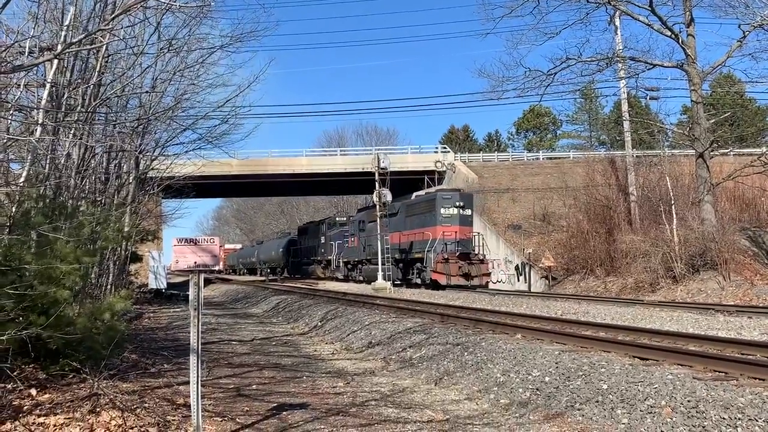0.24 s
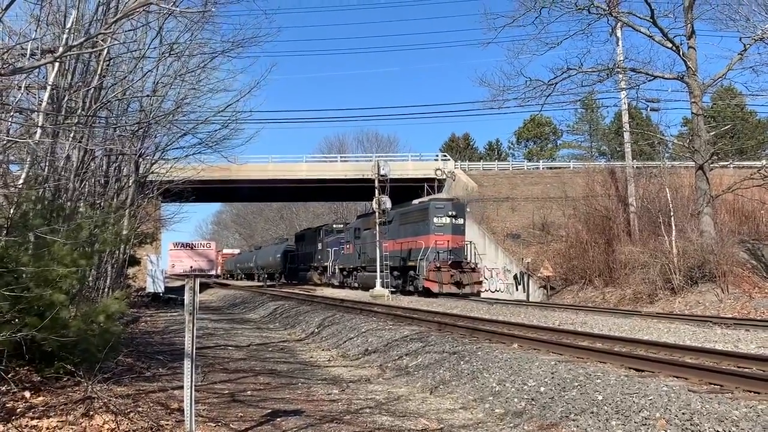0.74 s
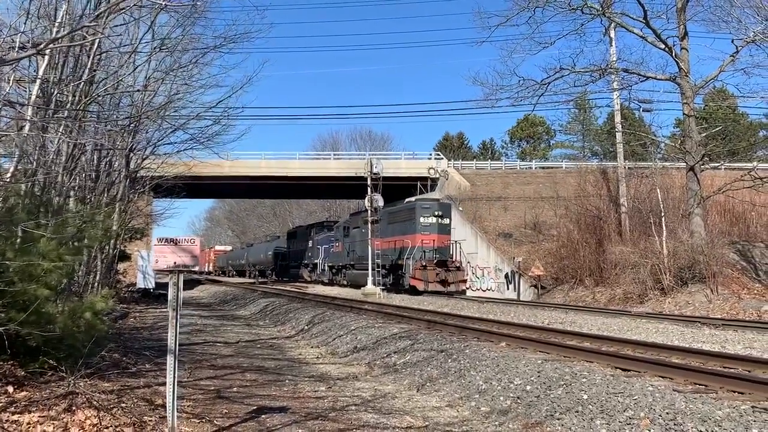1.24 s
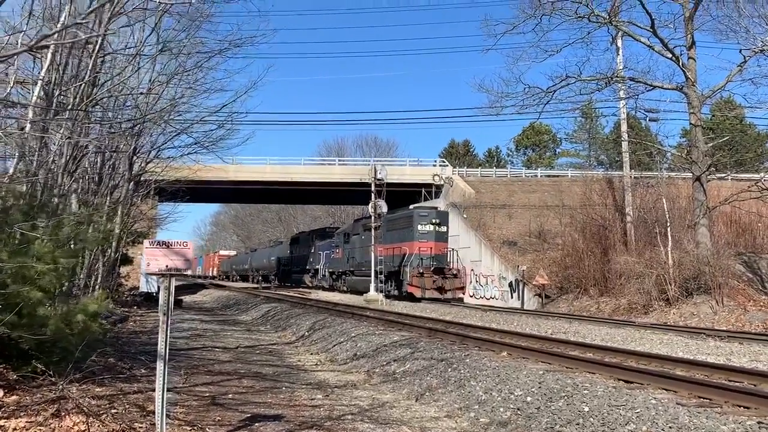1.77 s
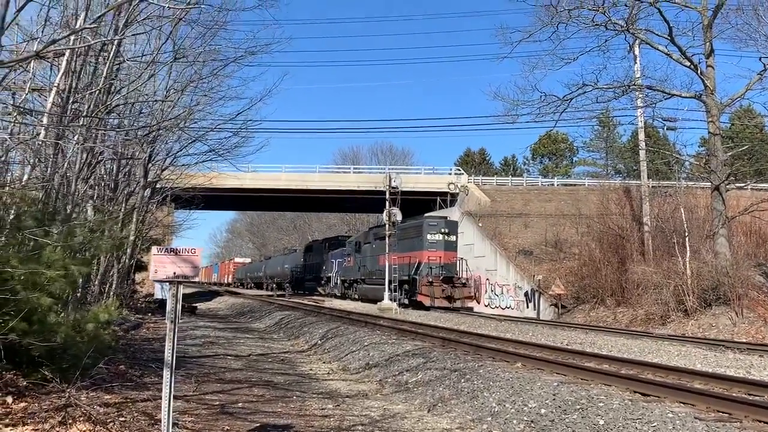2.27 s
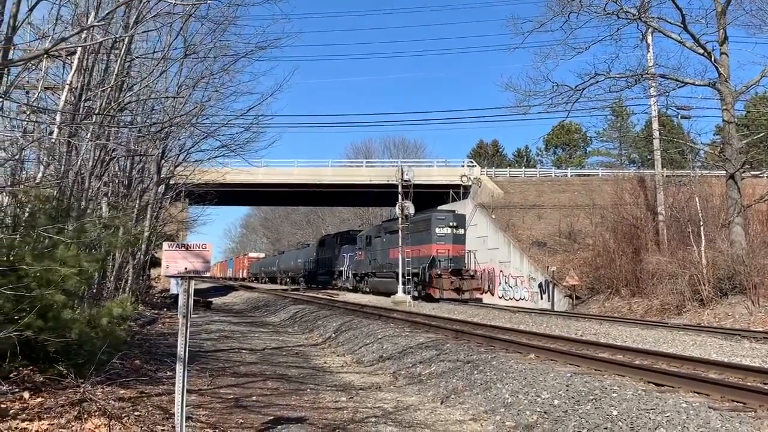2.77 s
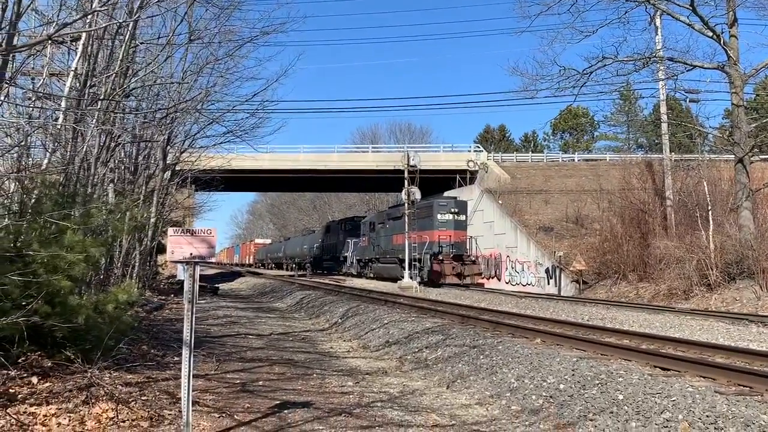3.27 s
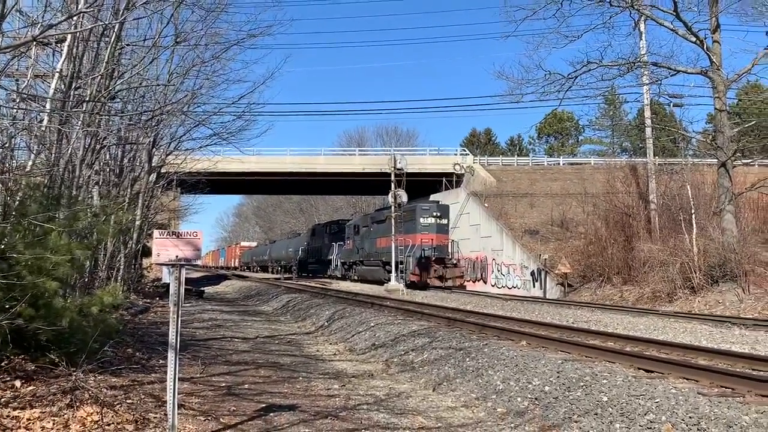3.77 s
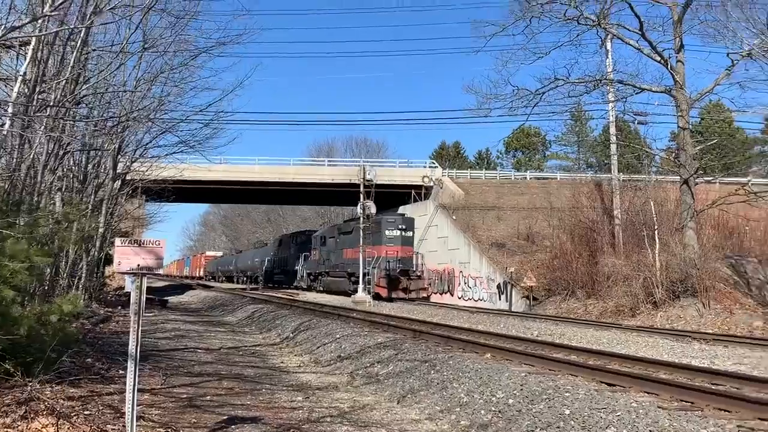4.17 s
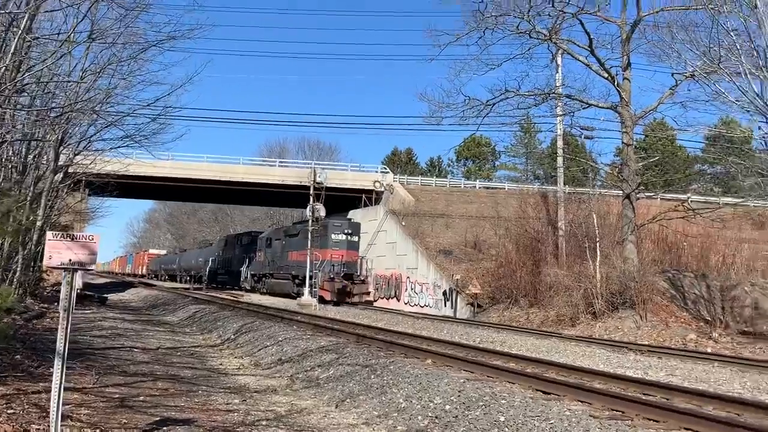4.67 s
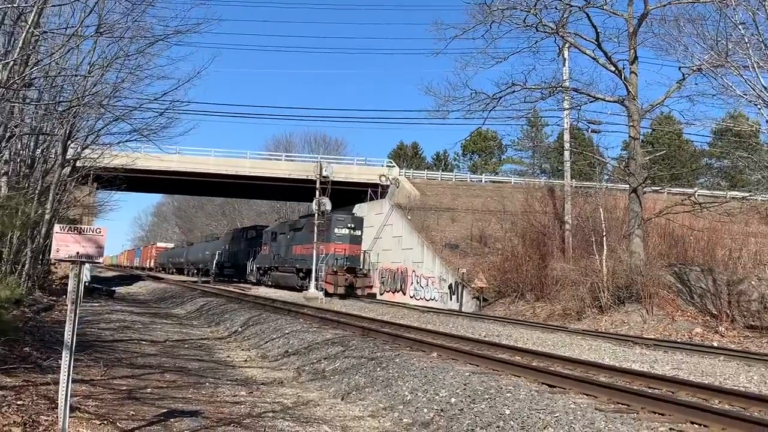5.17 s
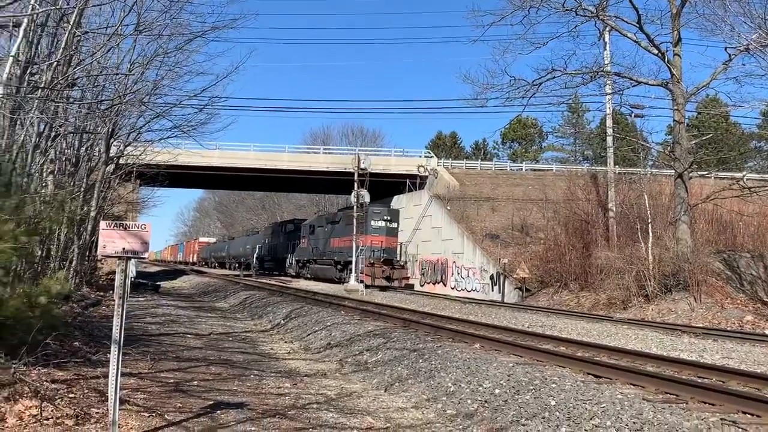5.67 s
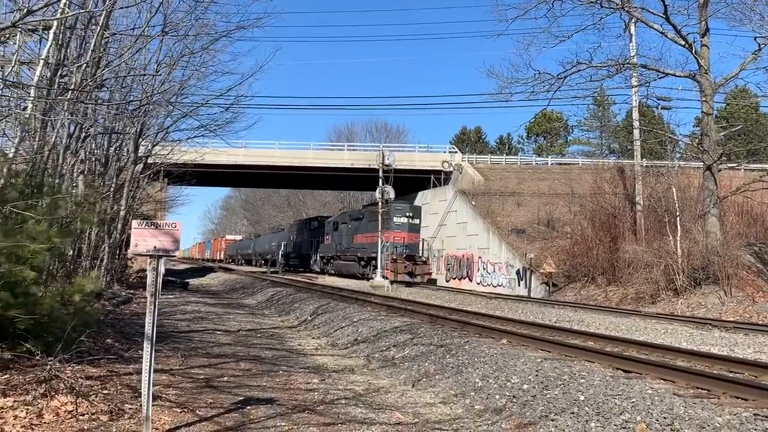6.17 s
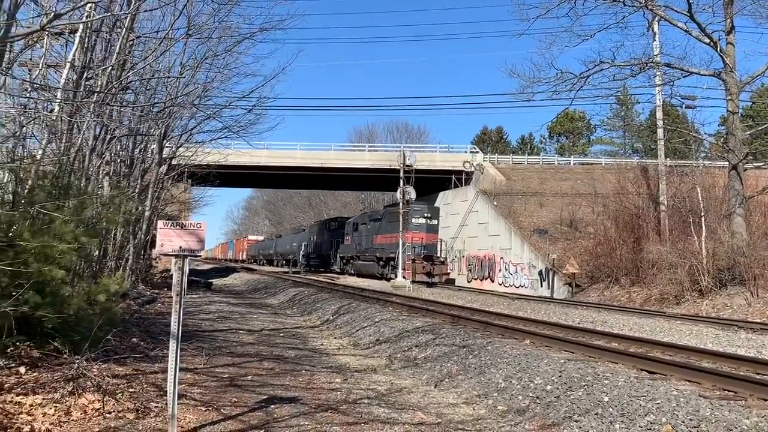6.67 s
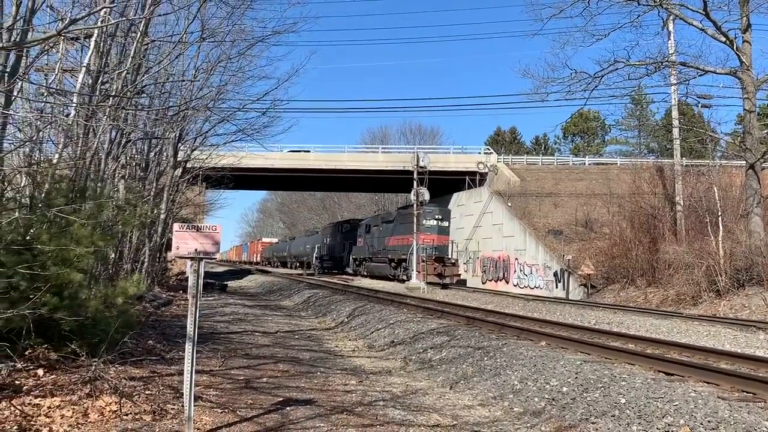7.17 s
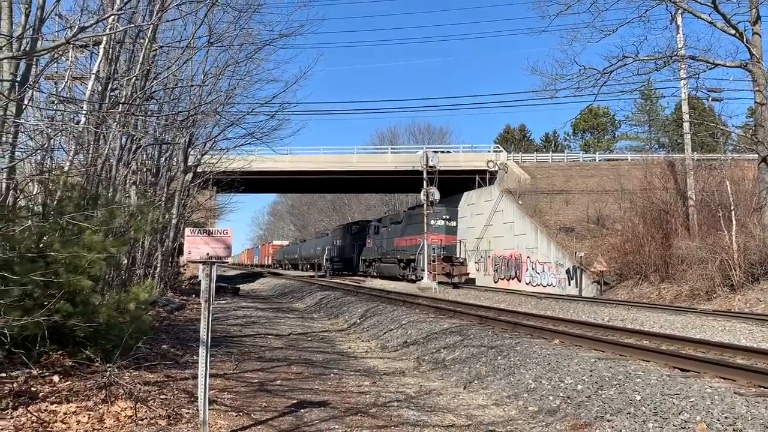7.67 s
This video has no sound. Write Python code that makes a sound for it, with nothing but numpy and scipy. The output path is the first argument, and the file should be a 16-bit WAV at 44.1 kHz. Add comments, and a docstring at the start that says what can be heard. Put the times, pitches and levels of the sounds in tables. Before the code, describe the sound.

A broad, rough diesel roar with piercing high whines drops in pitch and level as the throttles close on two locomotives under a bridge. The growl and hiss thin out, leaving a low pulsing idle, a faint mid-high hum and steady whistles. Crisp puffs and spits of compressed air come at intervals, plus a few soft mechanical thumps. Open-air stereo perspective from trackside, with short echoes after the air bursts.

```python
"""Exhaust beats, rough gear tones and two high whines sink in pitch and settle, over a broad roar.
Two coupled diesel locomotives throttle down under a road bridge; each crankshaft sets the pitch of its
firing tone, gear meshes and turbocharger. Shaped noise makes the roar and the spits and puffs of air,
damped sines make a few dull thumps, and the two ports hear it all with a phase offset."""
import sys
import numpy as np
from scipy import signal
from scipy.fft import rfft, irfft, next_fast_len
from scipy.io import wavfile
from scipy.ndimage import uniform_filter1d, map_coordinates

SR = 44100
rng = np.random.default_rng(int(sys.argv[2]) if len(sys.argv) > 2 else 0)


def log_audio(samples):
    """Write samples as a 16-bit WAV file to the path given in sys.argv[1]."""
    # one column per channel
    frames = np.atleast_2d(samples).T
    # limit to full scale, then quantise
    limited = np.clip(frames, -1, 1)
    pcm = np.round(limited * 32767).astype(np.int16)
    wavfile.write(sys.argv[1], SR, pcm)


N = 349713  # samples

WHINE_PER_TURN = 845  # whine cycles per crankshaft turn
IDLE_HZ = 4850  # whine of the second engine at idle

# Shaft orders filled in by uneven cylinders:
# order (cycles per turn), first_engine_db, second_engine_db
UNEVEN_ORDERS = np.array([(7, -22, -8), (9, -14, 2), (10, -19, -15), (11, -18, -14), (12, -22, -17),
                 (13, -18, -16), (14, -22, -16), (15, 1, -2), (16, -15, -12), (17, -13, -8), (18, -15, -13),
                 (20, -13, -13), (24, -16, -9), (36, -24, -17)])


def engine(whine_hz, whine_db, firing_db, uneven_db, pattern_db):
    """Harmonic orders of one shaft: beat and whine glide together, and a resonant stack lifts passing orders."""
    # exhaust stack resonances: frequency_hz, gain_db
    stack_gain = [(35, -25), (52, -15), (58, -21), (68, 4), (82, 5), (92, -3.5), (110, -17.5), (160, -6.5)]
    firing_order = 8  # beats per turn
    strong_turn = .39  # point in the turn where the strongest cylinder fires
    lumpy_db = 1.6  # how unevenly the engine fires at idle
    turns = crank(whine_hz) - strong_turn

    beat = amp(firing_db) * tone(firing_order * turns, flicker_db=.3, rate=2.3, smear=.05)
    for order, order_db in zip(np.round(UNEVEN_ORDERS[:, 0]), pattern_db):
        level = amp(uneven_db + order_db + resonance_db(stack_gain, order, whine_hz))
        beat += level * tone(order * turns, flicker_db=2.8, rate=3.5, smear=order / 30)
    # firing evens out with speed, fully so 2 dB above idle
    unevenness = np.clip(1 - speed_db(whine_hz) / 2, 0, 1)
    beat *= amp(lumpy_db * unevenness * wobble(7))

    # the beat once more, 400 samples late and wavering, which spreads it between the ports
    late_beat = 1.1 * wobble(3) * np.roll(beat, 400)
    blades = turns * WHINE_PER_TURN
    return np.array([beat + turbocharger(blades, whine_hz, whine_db),
                     late_beat + turbocharger(blades, whine_hz, whine_db)])


def turbocharger(blades, whine_hz, whine_db):
    """Blade-passing tone: turbulent inflow spreads it into a band, the more the faster it turns."""
    skirt = amp(-6 + 4 * speed_db(whine_hz))  # band over tone; 4 dB gained per dB of shaft speed
    pure = tone(blades, flicker_db=2.5, rate=80, smear=.8)
    spread = (pure + skirt * band(blades, rate=210)) / np.sqrt(1 + skirt ** 2)
    octave = amp(-19) * tone(2 * blades, flicker_db=4, rate=300, smear=1.4)
    return amp(whine_db + 1.5 * wobble(7) + 1.8 * wobble(28)) * (spread + octave)


def gears(whine_hz, mesh, swells_db):
    """Tooth-mesh excitation at multiples of shaft rate, swelling and filtered by the casing's resonances."""
    # gear casing resonances: frequency_hz, gain_db
    casing_gain = [(400, -12), (470, -1), (540, 4), (600, 2), (680, 3), (825, -6), (900, 2), (980, -1),
                   (1150, -7), (1500, 0), (1650, 1.5), (1800, -3.5), (2000, 5.5), (2150, 0.5), (2250, 6),
                   (2450, 3.5), (2700, -10), (3050, -2), (3500, -11.5), (3900, 2), (4250, 7), (4600, -14)]
    base_db = -48 + speed_db(whine_hz)  # 1 dB gained per dB of shaft speed
    turns, out = crank(whine_hz), np.zeros((2, N))
    for order, order_db in mesh:
        through_db = resonance_db(casing_gain, order, whine_hz)
        swell = amp(base_db + order_db + through_db + swells_db.get(order, 0) + 1.5 * wobble(6))
        rate = 10 + order / 8  # higher teeth waver faster
        for path in range(2):
            out[path] += swell * tone(order * turns + rng.random(), flicker_db=2.5, rate=rate, smear=.7)
    return out


def air():
    """Turbulent jet noise: valve spits burst and echo with exponential decay; puffs swell and fade."""
    # air valve spits: start_s, level_db, low_part_db, echoes_db, fade_s
    spits = [(1.457, -44, -3, -12, 0.0038), (2.6192, -29, 0.5, -8, 0.0052), (5.025, -49.5, -0.5, 1, 0.0073),
             (5.526, -25, -12.5, -22.5, 0.0015), (5.927, -42, -2.5, -11.5, 0.0042),
             (7.5239, -38, 1, -0.5, 0.015)]
    # soft blows of air: centre_s, level_db, half_length_s
    puffs = [(1.024, -45, 0.12), (1.55, -37, 0.066), (3.665, -47, 0.016)]
    # spectrum of the upper jet noise: frequency_hz, density_db
    jet_high = [(4000, -120), (5000, -16), (7000, 11.5), (11000, 7.5), (15700, 1), (16200, -120)]
    # spectrum of the lower jet noise: frequency_hz, density_db
    jet_low = [(1000, -120), (1500, -0.5), (2500, -6), (3300, 2), (4200, -8.5), (5200, 0.5), (6500, -17),
               (8000, -120)]
    # spectrum of the puffs: frequency_hz, density_db
    puff_colour = [(1200, -120), (1500, 4), (2300, 4.5), (3200, 0), (4200, -3.5), (6000, -13.5),
                   (9000, -120)]
    rise_s, echo_t60_s = 0.0049, 0.28
    slaps, slap_half_s = [(0.075, -21), (0.099, -16)], 0.008  # bridge returns: (delay s, dB over the echoes)
    nozzle_hz, nozzle_width_hz, nozzle_db = 4230, 1200, -6  # the valve body colours the jet
    t = np.arange(N) / SR
    high, low, soft = np.zeros((3, N))

    for start_s, level_db, low_db, echo_db, fade_s in spits:
        since = np.clip(t - start_s, 0, None)
        rise = np.clip(since / rise_s, 0, 1)
        burst = np.exp(-(since / (rise_s + fade_s)) ** 2)
        echoes = amp(echo_db - 60 * since / echo_t60_s)
        shape = rise * (burst + echoes)
        for delay_s, slap_db in slaps:
            shape += amp(echo_db + slap_db) * np.exp(-((since - delay_s) / slap_half_s) ** 2)
        high += amp(level_db) * shape
        low += amp(level_db + low_db) * shape
    for centre_s, level_db, half_s in puffs:
        soft += amp(level_db) * np.exp(-((t - centre_s) / half_s) ** 2)

    sputter = amp(1.8 * wobble(160))
    jet = sputter * (high * rush(jet_high, patchy_db=.5) + low * rush(jet_low, patchy_db=.5))
    nozzle = [(nozzle_hz - nozzle_width_hz, -40), (nozzle_hz, 0), (nozzle_hz + nozzle_width_hz, -40)]
    ring = amp(nozzle_db) * low * rush(nozzle, patchy_db=.5)
    return jet + ring + soft * rush(puff_colour, patchy_db=1.2)


def thumps():
    """Impulse response of damped modes: each dull knock excites four short-lived sines, direct sound only."""
    # strikes: start_s, level_db
    strikes = [(4.819, -27), (4.839, -8), (4.8515, -12.5), (4.870, -14), (4.894, -19), (6.908, -24)]
    # modes of what is knocked: frequency_hz, level_db, t60_s
    modes = [(410, 2, 0.0098), (680, -13, 0.019), (977, -15, 0.019), (184, -0.5, 0.024)]
    out, t = np.zeros((2, N)), np.arange(SR // 20) / SR
    ringing = sum(amp(db - 60 * t / t60) * np.sin(2 * np.pi * hz * t) for hz, db, t60 in modes)
    knock = ringing * (1 - np.exp(-t / 0.00035))  # softened onset
    for start_s, level_db in strikes:
        out[0, round(start_s * SR):][:len(t)] += amp(level_db) * knock
    return out


def roar(whine_hz):
    """Broadband noise scaled by shaft speed: four layers sink with it, while a band of hum emerges at idle."""
    # exhaust rumble spectrum: frequency_hz, density_db
    rumble = [(12, -120), (20, -24), (30, -27), (45, -10), (75, -9), (98, -10.5), (134, -8), (200, -13.5),
              (281, -14.5), (331, -19.5), (389, -19.5), (500, -44), (650, -120)]
    # body drone spectrum: frequency_hz, density_db
    drone = [(250, -26), (420, -3.5), (492, -7.5), (537, -1.5), (657, -4.5), (724, -8.5), (801, -2),
             (914, 0), (1040, -10.5), (1200, -17), (1560, -48.5), (2640, -120)]
    # valve-gear clatter spectrum: frequency_hz, density_db
    clatter = [(1000, -120), (1080, 5.5), (1300, 4), (1450, 5), (1620, -1), (1800, -0.5), (2400, -4),
               (2700, -5.5), (3300, -7), (4000, -13), (5000, -11), (5500, -25), (6300, -120)]
    # intake hiss spectrum: frequency_hz, density_db
    hiss = [(4500, -120), (5000, 5.5), (6500, 4), (7400, 4), (8000, 0), (10000, -3), (12000, -10),
            (14000, -18), (15300, -26), (16000, -120)]
    # hum spectrum: frequency_hz, density_db
    hum = [(1300, -120), (1420, -1), (1500, 5), (1580, 4.5), (1650, 5), (1700, -17), (1900, -120)]
    lull_s, lull_half_s, lull_db = 3.8, 0.72, -2.3  # the throttle shuts before idle catches
    lull = amp(lull_db * np.exp(-((np.arange(N) / SR - lull_s) / lull_half_s) ** 2))

    def level(idle_db, grows, waver_db):
        """Power law of shaft speed: grows is in dB per dB, with a slow random waver."""
        return amp(idle_db + grows * speed_db(whine_hz) + waver_db * wobble(3.1))

    return (level(-30.5, grows=1.75, waver_db=.49) * lull * rush(rumble, patchy_db=1.5)
            + level(-38, grows=.94, waver_db=.31) * lull * rush(drone, patchy_db=1.0)
            + level(-44, grows=1.84, waver_db=.17) * rush(clatter, patchy_db=1.5)
            + level(-63.5, grows=2.47, waver_db=.99) * rush(hiss, patchy_db=3.5)
            + level(-49.5, grows=-16, waver_db=.5) * rush(hum, patchy_db=0.5))


def crank(whine_hz):
    """Phase is the integral of frequency: crankshaft turns so far, the turbocharger being geared to the shaft."""
    return np.cumsum(whine_hz) / SR / WHINE_PER_TURN


def speed_db(whine_hz):
    """Logarithmic ratio: shaft speed over idle, in dB."""
    return 20 * np.log10(whine_hz / IDLE_HZ)


def resonance_db(points, order, whine_hz):
    """Source-filter principle: the gain a gliding order meets, updated every 64 samples."""
    return along(points, order * whine_hz[::64] / WHINE_PER_TURN).repeat(64)[:N]


def tone(cycles, flicker_db, rate, smear):
    """Random modulation by moving air: a tone of rms about 1 wavers in level and in phase (smear, radians)."""
    level = np.sqrt(2) * amp(flicker_db * wobble(rate))
    return level * np.cos(2 * np.pi * cycles + smear * wobble(rate))


def band(cycles, rate):
    """Quadrature modulation: noise of rms about 1 in a soft-edged narrow band that follows a gliding pitch."""
    def size():
        """Random amplitude: a slow and a three times faster wobble added."""
        return .85 * wobble(rate) + .5 * wobble(3 * rate)

    return size() * np.sin(2 * np.pi * cycles) + size() * np.cos(2 * np.pi * cycles)


def rush(spectrum, patchy_db):
    """Diffuse turbulence: two unrelated noises of one colour, joint rms 1, share patches of random gain."""
    bins = signal.stft(rng.standard_normal((2, N)), nperseg=512)[2]
    field = uniform_filter1d(rng.standard_normal(bins.shape[1:]), size=5, axis=0)  # over frequency
    field = uniform_filter1d(field, size=12, axis=1)  # over time
    pair = signal.istft(bins * amp(patchy_db * unit(field)), nperseg=512)[1][:, :N]
    return unit(filtered(pair, lambda hz: amp(along(spectrum, hz))))


def wobble(rate):
    """Band-limited random motion: a smooth curve through rate random knots a second."""
    knots = rng.standard_normal(int(N * rate / SR) + 4)
    coarse = map_coordinates(knots, [np.arange(0, N + 32, 32) * rate / SR])
    return np.interp(np.arange(N) / 32, np.arange(len(coarse)), coarse)


def filtered(x, response):
    """Convolution theorem: the spectrum of x times a complex response of frequency."""
    size = next_fast_len(N + 8192)
    return irfft(rfft(x, size) * response(np.fft.rfftfreq(size, 1 / SR)), size)[..., :N]


def along(points, hz):
    """Logarithmic frequency scale: interpolate (Hz, value) points on it."""
    f, v = np.transpose(points)
    return np.interp(np.log(hz + 1), np.log(f + 1), v)


def curves(rows):
    """Linear interpolation in time: one value per sample for each column after the time."""
    s, *cols = np.transpose(rows)
    return [np.interp(np.arange(N) / SR, s, c) for c in cols]


def amp(db):
    """Decibel law: amplitude ratio of a level."""
    return 10 ** (np.asarray(db) / 20)


def unit(x):
    """Power normalization: x scaled to rms 1."""
    return x / np.sqrt(np.mean(x ** 2) + 1e-20)


def scene():
    """Superposition of all sources: row one is direct sound, row two the part spread between the ports."""
    # first engine: time_s, whine_hz, whine_db, firing_tone_db
    first_course = [(0.0, 6990, -38.5, -44), (0.66, 6345, -46.5, -54.5), (1.65, 5710, -47, -30),
                    (2.0, 5443, -50.5, -29), (2.64, 5100, -49, -34), (3.3, 4580, -51.5, -32.5),
                    (3.7, 4380, -51.5, -35), (4.2, 4380, -46, -35), (4.6, 4389, -48, -50),
                    (5.1, 4397, -52, -42), (5.3, 4447, -47, -32), (5.5, 4401, -51.5, -23.5),
                    (5.95, 4388, -55, -31), (6.1, 4413, -48, -37), (6.6, 4417, -52.5, -25.5),
                    (7.1, 4397, -51, -41), (7.3, 4410, -44.5, -27), (7.55, 4433, -50.5, -25),
                    (7.93, 4427, -54, -24)]
    # second engine: time_s, whine_hz, whine_db, firing_tone_db
    second_course = [(0.0, 7570, -48, -13.5), (0.28, 7370, -51, -12), (0.4, 7285, -50, -16.5),
                     (0.56, 7110, -51, -13), (0.72, 7030, -46, -14), (0.88, 6865, -53, -18.5),
                     (1.1, 6797, -54.5, -19), (1.65, 6435, -55, -18.5), (1.98, 6200, -58, -40),
                     (2.25, 6040, -56.5, -19.5), (2.64, 5830, -59, -22.5), (3.3, 5425, -57.5, -29),
                     (3.9, 5126, -54, -26.5), (4.29, 4845, -55.5, -31), (4.62, 4790, -52, -26),
                     (4.95, 4806, -49, -21), (5.5, 4889, -55, -33.5), (6.15, 4845, -54, -27.5),
                     (6.7, 4837, -54.5, -29), (7.25, 4847, -53.5, -25), (7.93, 4828, -55, -30)]
    # level of the uneven orders of both engines: time_s, level_db
    throb = [(0, -2), (0.4, -2.5), (0.75, -3), (1.2, 0.5), (1.7, -2), (2.1, -0.5), (2.5, 5), (3.6, 0.5),
             (4.5, 1), (5.1, 1), (5.5, 1), (6.3, -1.5), (7.1, 3.5), (7.5, -5.5), (7.93, 4.5)]
    # tooth meshes of the second engine: order (cycles per turn), level_db
    near_mesh = np.array([(79, -1), (144, 0), (158, -1), (200, -13), (288, -7), (432, -15), (576, -20)])
    # what carries of the first engine's mesh: order (cycles per turn), level_db
    far_mesh = np.array([(158, -1), (288, -13)])
    # separate swells of three meshes: time_s, order_144_db, order_158_db, order_288_db
    mesh_swells = [(0, -4, -1, -1), (0.5, -9, -6, -2.5), (1.0, 3, 1, -4.5), (1.4, -5, 9, -9),
                   (1.75, 7, 0, -3.5), (2.05, -13, 10, 4.5), (2.35, -10, 3, -9.5), (2.6, 1, 8.5, 1),
                   (2.95, 7.5, -5, -1), (3.25, -0.5, 0.5, -1), (3.7, 3, 3, 6), (4.1, -7, 2.5, -6),
                   (4.6, 6, -2.5, -0.5), (7.93, -0.5, 2, 1)]
    # swell of the lowest mesh: time_s, order_79_db
    low_swell = [(0, -5.5), (0.45, 3), (0.9, -2.5), (1.4, -2), (2.0, -8), (2.55, 3.5), (3.0, -0.5),
                 (3.4, -6.5), (4.0, 0.5), (4.6, -4.5), (7.93, -5)]
    first, second, (throb_db,) = curves(first_course), curves(second_course), curves(throb)
    swells_db = dict(zip((144, 158, 288, 79), curves(mesh_swells) + curves(low_swell)))

    engines = (engine(*first, throb_db - 32.5, UNEVEN_ORDERS[:, 1])
               + engine(*second, throb_db - 28, UNEVEN_ORDERS[:, 2]))
    meshes = gears(second[0], near_mesh, swells_db) + gears(first[0], far_mesh, {})
    return engines + meshes + air() + thumps() + roar(second[0])


def record(dry):
    """Interaural coherence: each port mixes direct and spread sound with its own phase and gain."""
    # the ports: frequency_hz, left_lead_rad, likeness (0-1), left_minus_right_db
    ports = [(0, 0, .96, 1.5), (90, .1, .95, 1.3), (200, .2, .9, 0), (480, .7, .85, 0), (730, 1, .6, 7),
             (950, .8, .9, 2), (1300, 3.9, .65, 5), (1650, 4.7, .45, 3), (2300, 6.5, .8, 0),
             (3000, 8.8, .75, -1), (3900, 12.2, .6, -1), (4900, 16.4, .7, -6), (5600, 13.3, .5, -4),
             (6900, 11.5, .9, 0), (8100, 9.6, .98, 0), (8900, 9.2, .98, 0), (10800, 6.3, .92, 0),
             (13000, 3.4, .97, 0), (13900, 2.9, .98, 0), (16000, 0, .9, 0)]
    top_hz = 15800  # nothing passes from here up
    f, lead, alike, balance_db = np.transpose(ports)

    def mixing(hz):
        """Rotation of two equal-power sources: half the arccosine of likeness sets their shares."""
        angle = np.arccos(np.clip(np.interp(hz, f, alike), 0, 1)) / 2
        return np.array([np.cos(angle), np.sin(angle)])

    def offsets(hz):
        """Symmetric transfer functions: each port takes half the lead and balance, with opposite signs."""
        left = amp(np.interp(hz, f, balance_db) / 2) * np.exp(.5j * np.interp(hz, f, lead))
        return np.array([left, 1 / left]) * (hz < top_hz)

    direct, spread = filtered(dry, mixing)
    return filtered(np.array([direct + spread, direct - spread]), offsets)


dry = scene()
out = record(dry)
log_audio(out)
```